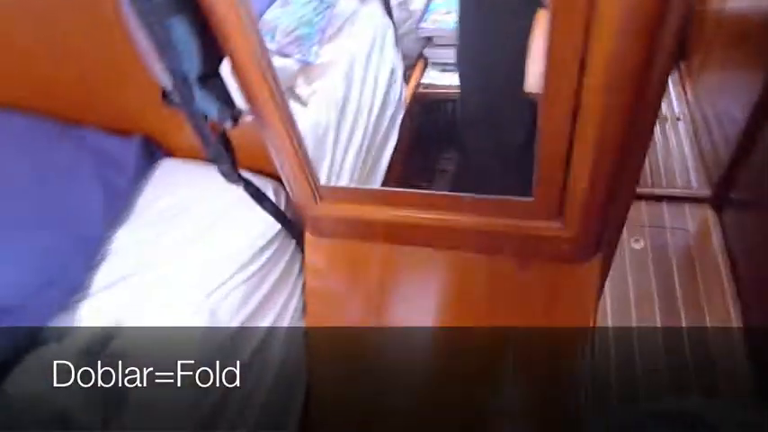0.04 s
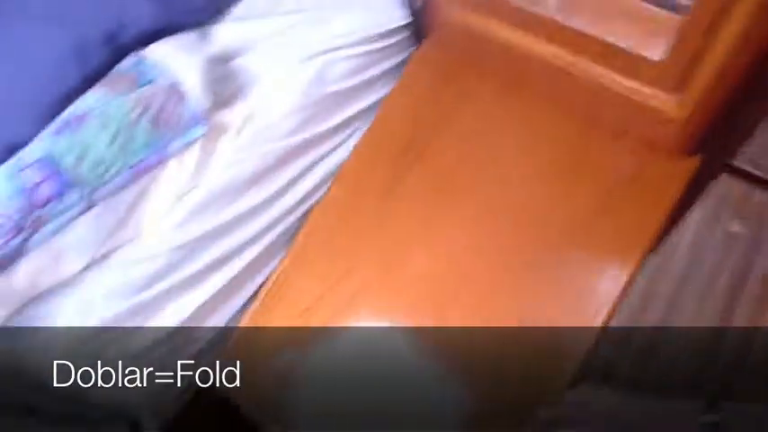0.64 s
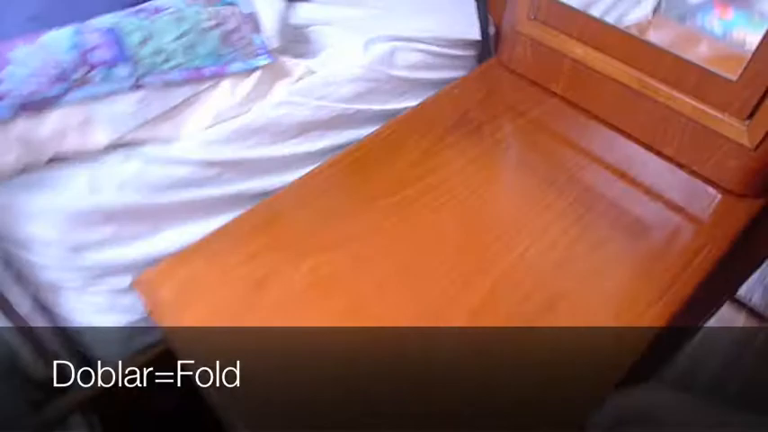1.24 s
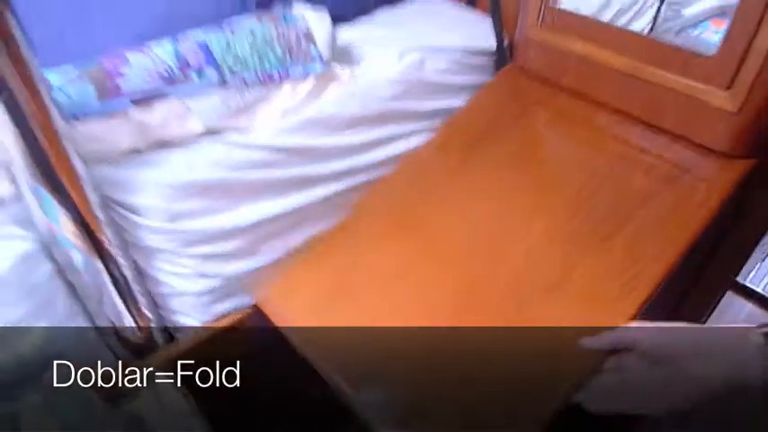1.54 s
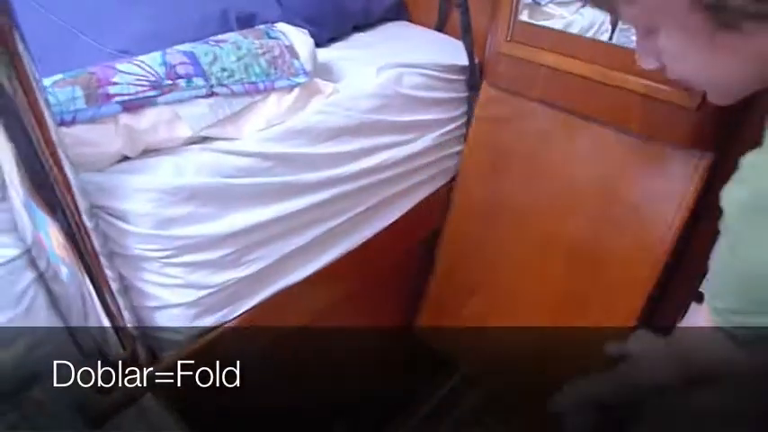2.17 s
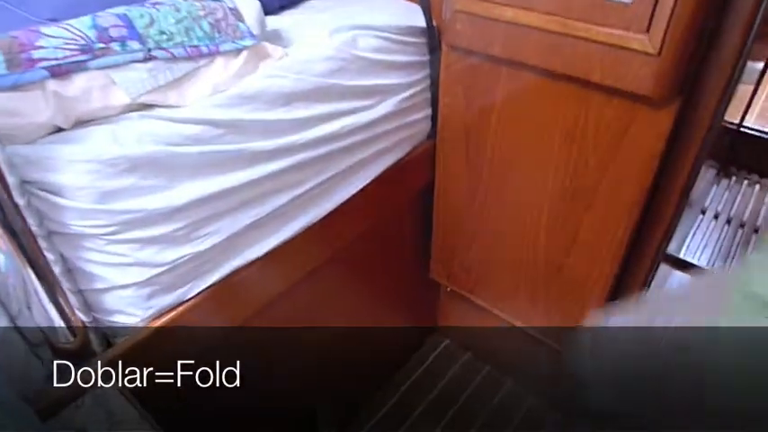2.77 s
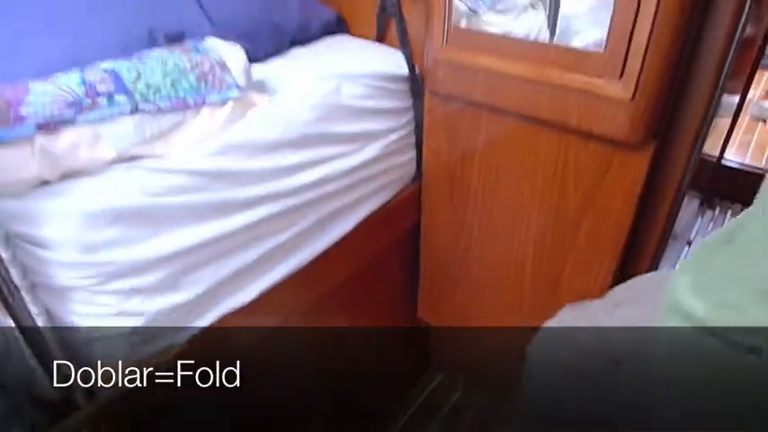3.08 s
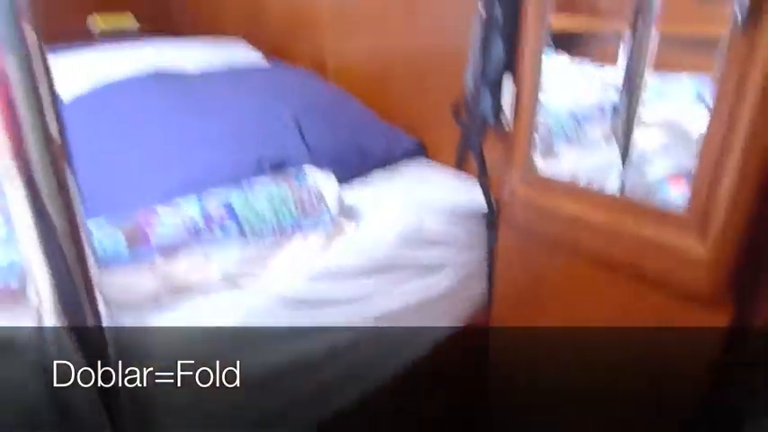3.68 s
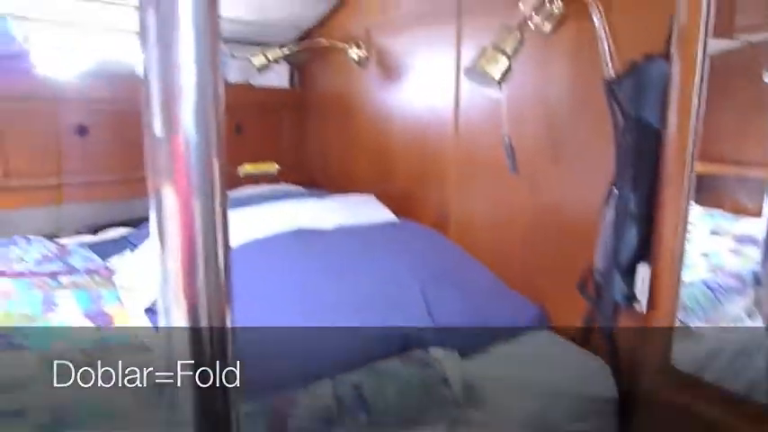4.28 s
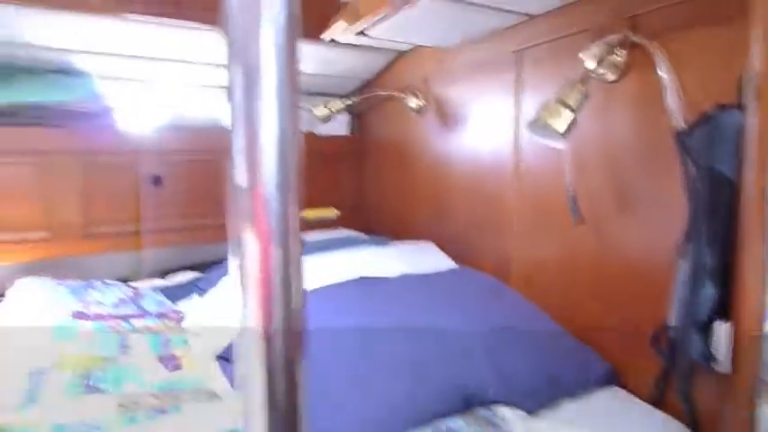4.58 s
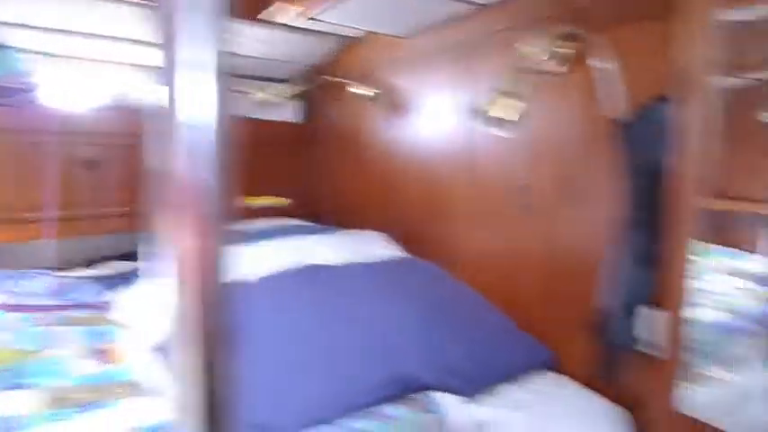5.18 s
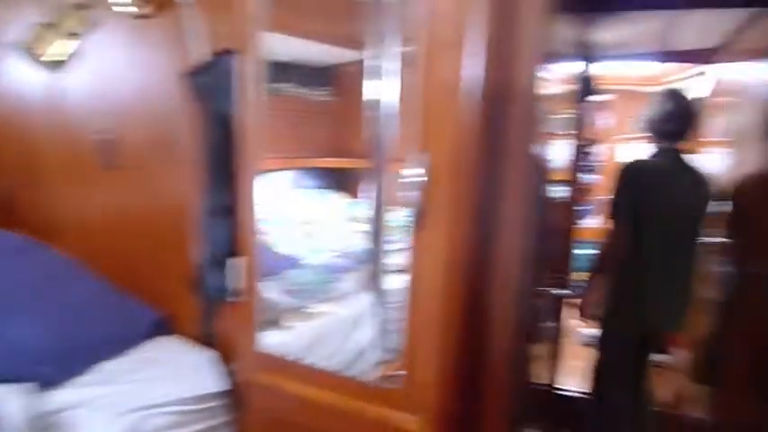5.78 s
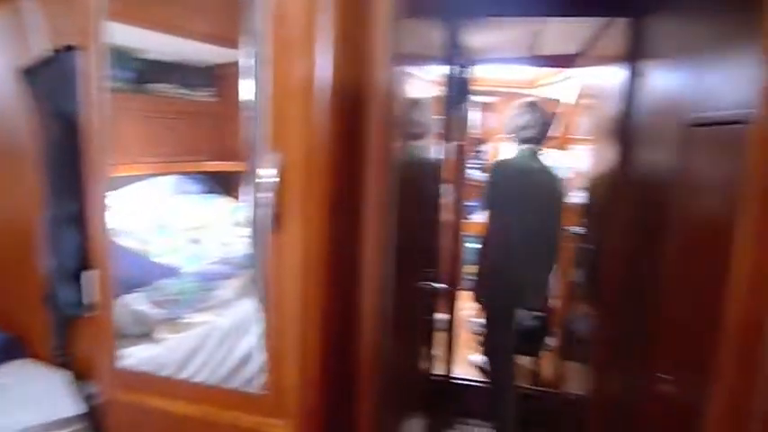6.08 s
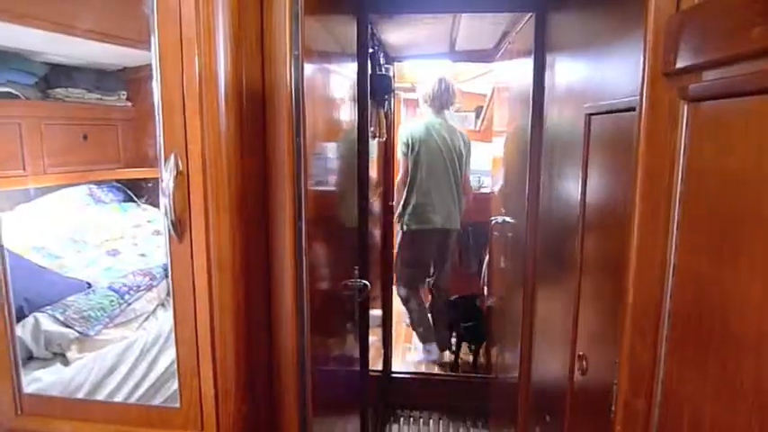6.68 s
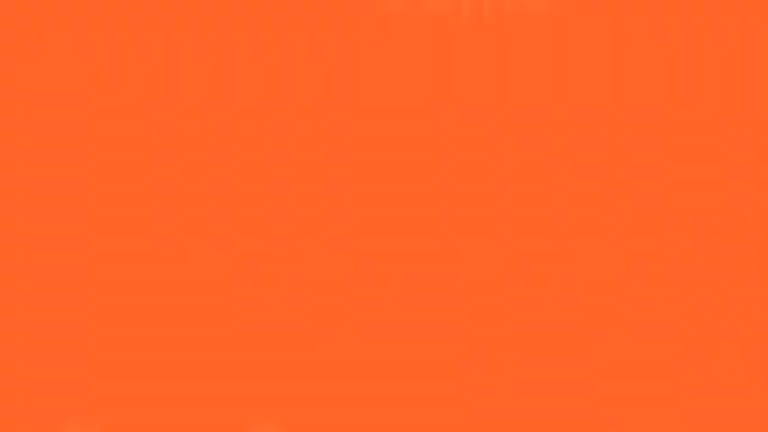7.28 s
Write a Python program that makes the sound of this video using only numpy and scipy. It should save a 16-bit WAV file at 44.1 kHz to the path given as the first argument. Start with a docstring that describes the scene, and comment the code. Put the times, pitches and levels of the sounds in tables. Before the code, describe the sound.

A small wooden boat cabin is heard through a dull handheld microphone, with a faint steady hiss and fan hum. In the first half second come soft thuds and a cluster of close finger clicks, then quiet shuffling and tiny scrapes. A hinged table leaf taps lightly from about 2.1 seconds and hits its stop with a loud, briefly ringing knock at 2.4. At 3.1 it is shoved home with a firm double knock. From about 3.8 someone walks off, with uneven low thuds on a hollow floor, panel bumps, rustling clothes and grip rumble. The heaviest thud lands at 5.4. More knocks, sharp clicks and short scrapes bunch together between 6.1 and 6.4, and a loose board rattles around 7. The fan grows slightly louder along the way. After one last footstep, everything fades quickly at about 7.2 seconds.

```python
"""Inside a small wooden boat cabin, a hinged table leaf is folded down and knocked home, then someone
walks off. Struck panels ring briefly in the tight space, feet set the hollow floor swinging and a loose
board rattles. Hands and soles slide on wood, clothes rustle and a fan hums faintly over a steady hiss.
Fingers click and rumble on the handheld camera, whose dull microphone fades out at the end."""
import sys
import numpy as np
from scipy import signal
from scipy.fft import rfft, irfft
from scipy.io import wavfile
from scipy.ndimage import uniform_filter1d

SR = 44100
rng = np.random.default_rng(int(sys.argv[2]) if len(sys.argv) > 2 else 0)


def inscribe(sig):
    """Save sig as 16-bit PCM at rate SR to the path in sys.argv[1].

    A 1-D sig is mono; a 2-D sig holds one channel per row.
    Samples are clipped to [-1, 1] before scaling.
    """
    pcm = np.round(np.clip(np.atleast_2d(sig).T, -1, 1) * 32767)
    wavfile.write(sys.argv[1], SR, pcm.astype(np.int16))


N = 332073
TIME = np.arange(N) / SR
HIT = TIME[:SR // 2]  # half a second: the clock for one short sound


# the leaf swings down, scuffs its frame and hits the stop: t/s, level/dB, hardness (0 soft, 1 hard)
LEAF_BLOWS = [(2.094,-37.5,0.01), (2.17,-39.5,0.31), (2.251,-37,0.3), (2.3525,-25.5,0.74),
              (2.364,-23.5,0.38)]
# the leaf's own notes: f/Hz, level/dB, t60/s (the time to die away by 60 dB)
LEAF_NOTES = [(172,-0.5,0.11), (286.6,5,.24), (324,3,.14), (422,-6,.12), (509,4,0.092), (678,4,0.11),
              (741,0,.12), (878,1.5,0.088), (950,-1,0.08), (1025,0,.11), (1160,-3.5,0.089), (1470,-8,0.068),
              (1700,-4.5,.13), (1880,-9.5,.13), (2100,-5,0.093), (2210,-5.5,0.13), (2577,-6.5,.11),
              (2980,-3,0.084), (3160,-5.5,0.11), (3600,-5,.1)]

def table_leaf():
    """Each blow makes the wooden leaf ring clearly with its own notes."""
    out = np.zeros(N)
    for s, db, hardness in LEAF_BLOWS:
        add(out, s, knock(LEAF_NOTES, db, hardness, t60=0.17, notes_db=7, scatter_db=2))
    return out


# the leaf is shoved home, edge first and then flat: t/s, level/dB, hardness
FRAME_BLOWS = [(3.0396,-25,.4), (3.0644,-24.5,0.49), (3.0767,-31.5,.3)]
# the frame's own notes: f/Hz, level/dB, t60/s
FRAME_NOTES = [(169.5,-0.5,.15), (265.7,0,.13), (351,-0.5,.13), (400,-3,.13), (470,-1,0.088), (518,1,0.077),
               (555,-1,0.11), (638,-1,.14), (681,-2.5,.12), (854,-10,0.069), (1080,-10,.1), (1332,-7.5,.14),
               (1520,-12,.15), (1573,-10,.1), (1653,-10,.1), (1873,-8,0.082), (2150,-13.5,.12),
               (2600,-10.5,.11), (2848,-18,.12), (3220,-15,.09), (3510,-8.5,0.079)]

def table_frame():
    """The frame rings briefly as the leaf is pushed against it."""
    out = np.zeros(N)
    for s, db, hardness in FRAME_BLOWS:
        add(out, s, knock(FRAME_NOTES, db, hardness, t60=0.095, notes_db=5, scatter_db=5))
    return out


# borders of a knock's four pitch bands (boom, body, rap and crack): f/Hz
BAND_EDGES = [120, 280, 700, 1700, 4500]

def knock(notes, db, hardness, t60, notes_db, scatter_db, soft_hz=189.5, hard_hz=2800):
    """A blow on wood: a short tick, the wood's own notes and dense echoes off the close walls."""
    # a harder blow sounds brighter; it loses 3.5 dB an octave below its centre and 8 above
    centre_hz = soft_hz * (hard_hz / soft_hz) ** hardness
    edges = np.log2(BAND_EDGES)
    octaves = (edges[:-1] + edges[1:]) / 2 - np.log2(centre_hz)
    band_dbs = db + np.minimum(3.5 * octaves, -8 * octaves)
    tones = []
    for hz, note_db, note_t60 in notes:
        # each spot on the wood wakes its own mix of notes
        detune, size = rng.standard_normal(2)
        tone = np.sin(2 * np.pi * (hz * (1 + 0.0067 * detune) * HIT + rng.random()))
        # a hand or foot resting on the wood cuts the ring short
        tones.append((hz, undb(note_db + scatter_db * size) * decay(min(note_t60, t60)) * tone))
    # a soft, dull blow takes longer to reach full strength
    push_s = 0.0029 * 2 ** ((max(band_dbs) - band_dbs[-1]) / 14)
    push = 4 - np.exp(-HIT / push_s)
    contact = undb(1) * decay(0.0044)
    out = 0
    for lo, hi, band_db in zip(BAND_EDGES, BAND_EDGES[1:], band_dbs):
        # bedding and cushions soak up the treble slightly sooner
        tail = decay(t60 * (BAND_EDGES[1] / hi) ** 0.0098)
        noise = rng.standard_normal(len(HIT)) * (contact + tail)
        echoes = strike_level(band(noise * push, lo, hi), 0)
        ringing = sum(tone for hz, tone in tones if lo <= hz < hi)
        ring = strike_level(band(ringing * push, lo, hi), notes_db)
        tick = strike_level(band(1. * (HIT == 0), lo, hi), -8)
        out = out + strike_level(tick + echoes + ring, band_db)
    return out


# steps and soft bumps on the floor and lockers, and the leaf's deep ring as it hits the stop: t/s, peak
# level/dB, f/Hz, push time/s
THUDS = [(0.029,-34,93.5,0.0026), (.277,-37.5,157,0.0034), (0.374,-42.5,172,0.006), (0.509,-31,110.5,.006),
         (2.3535,-23,299,0.002), (2.904,-35.5,93.6,0.014), (3.07,-21.5,170.6,0.0052),
         (3.346,-34.5,214,0.02), (3.772,-30,160,0.012), (4.238,-24,76.6,0.0074), (4.798,-20,87.5,0.012),
         (4.864,-23,78,0.028), (5.095,-28,224,0.015), (5.175,-31,166,0.013), (5.406,-15.5,133,0.0032),
         (5.425,-23.5,110.5,0.0036), (6.226,-26.5,234,0.0053), (6.382,-30.5,155,0.0045),
         (7.142,-22,146,0.0084)]

def footfalls(overtone_ratio=1.315, overtone_db=-9, rumble_db=-11, t60=0.12):
    """A soft heel pushes the hollow floor, which swings for a few cycles; the leaf's hardest blow swings the
    same way."""
    out = np.zeros(N)
    for s, db, hz, push_s in THUDS:
        phase = 2 * np.pi * hz * HIT
        swing = np.sin(phase) + undb(overtone_db) * np.sin(phase * overtone_ratio)
        low_noise = band(rng.standard_normal(len(HIT)), 33, 430, order=2)
        rumble = level(resonate(low_noise, hz, width_hz=hz), rumble_db)
        thud = (swing + rumble) * decay(t60) * np.minimum(HIT / push_s, 1)
        add(out, s, thud * undb(db) / np.abs(thud).max())
    return out


# bumps on doors, panels and floorboards: t/s, level/dB, hardness, t60/s of the cabin's ring
BUMPS = [(.031,-41.5,0.64,0.1), (.509,-41,0,0.17), (.827,-52,0.27,.08), (1.29,-45,0.27,0.11),
         (2.732,-46,0,0.044), (3.761,-37,0.32,0.15), (3.833,-46.5,0.83,0.34), (4.339,-33.5,0.47,0.3),
         (4.436,-43,0.54,0.14), (4.706,-38.5,0.2,0.12), (4.839,-39,0.76,0.41), (4.932,-37,0.57,0.2),
         (5.0805,-33,0.96,0.19), (5.089,-38.5,0.48,0.21), (5.144,-38.5,0.58,0.22), (5.216,-32.5,0.53,0.087),
         (5.2331,-30.5,0.9,0.12), (5.368,-31,0.46,0.29), (6.111,-40,0.64,0.13), (6.133,-36,0.66,0.15),
         (6.16,-35.5,0.52,0.21), (6.227,-36.5,0.77,0.26), (6.2602,-35.5,0.6,0.22), (6.641,-49,0.63,0.068),
         (7.144,-32.5,0.3,0.17)]
# the panels' own notes: f/Hz, level/dB, t60/s
PANEL_NOTES = [(166,0,0.19), (223,2,0.076), (263.2,-0.5,0.49), (319,8,0.19), (362.4,3.5,0.14),
               (441.5,-3.5,0.14), (501,-8.5,0.03), (559,-6.5,0.15), (642,-2,0.15), (683,-2,0.056),
               (774,-5.5,0.21), (882,-3.5,0.28), (993,-4,0.1), (1070,-7.5,0.074), (1223,-5.5,0.12),
               (1342,-5.5,0.12), (1497,-3,0.073), (1665,-7,0.048), (1890,-8,0.098), (2030,3,0.068),
               (2255,1,0.13), (2410,-5,0.14), (2600,-5,0.069), (2740,-1,0.063), (3020,-5,0.11),
               (3310,-3.5,0.047)]

def panel_bumps():
    """Bumped panels and boards ring less clearly than the table."""
    out = np.zeros(N)
    for s, db, hardness, t60 in BUMPS:
        add(out, s, knock(PANEL_NOTES, db, hardness, t60, notes_db=0, scatter_db=3.5))
    return out


# one blow and its bounces: t/s, level/dB, hardness
BOUNCES = [(6.933,-29,0.71), (6.946,-38,0.3), (6.963,-32.5,0.6), (6.995,-35.5,0.15), (7.011,-41,0.58),
           (7.029,-39,0.46), (7.046,-40,0.3)]

def loose_board():
    """A loose board is struck and rattles as it bounces unevenly."""
    out = np.zeros(N)
    for s, db, hardness in BOUNCES:
        add(out, s, knock(PANEL_NOTES, db, hardness, t60=0.17, notes_db=-0.5, scatter_db=5))
    return out


# fingers on the camera, and catches and stops nearby: t/s, level/dB, f/Hz, width/Hz, t60/s
CLICKS = [(0.03,-63,2200,1980,0.028), (0.2741,-30.5,1200,1700,0.0053), (0.2749,-29,3150,1500,0.0062),
          (.3027,-36.5,1900,3000,0.018), (.3055,-41.5,1600,2000,0.024), (.3178,-39.5,2600,2400,0.01),
          (.321,-43,2100,1500,.022), (.3263,-35.5,3070,1410,.012), (.3302,-42,2500,2000,0.015),
          (.3365,-44,2600,2000,0.02), (2.3525,-33,4100,3200,0.005), (2.3545,-32,2480,2000,0.03),
          (3.04,-25,445,130,0.043), (3.0655,-26,440,240,0.02), (3.0676,-32,1450,900,0.016),
          (3.066,-35.5,2900,900,0.025), (3.772,-42.5,870,200,0.091), (4.342,-32.5,955,220,0.18),
          (5.2325,-32,2500,900,0.014), (5.369,-32.5,890,700,0.11), (6.1118,-33.5,3300,1600,0.07),
          (6.1412,-29,404,600,0.013), (6.161,-39.5,3100,1200,0.028), (6.2128,-34.5,3040,900,0.13),
          (6.24,-37.5,3050,800,0.029), (6.2613,-24,620,260,0.077), (6.3809,-33,1450,450,0.016),
          (6.4068,-40,2600,2400,0.012), (6.643,-47.5,1000,500,.05), (6.816,-33.5,230,160,0.013),
          (7.072,-39.5,960,400,0.059)]

def clicks(chatter=0.29, case_db=-4):
    """Small contacts close to the microphone give a dry snap and a short chatter."""
    out = np.zeros(N)
    for s, db, hz, width_hz, t60 in CLICKS:
        force = chatter * rng.standard_normal(len(HIT)) * decay(t60)
        force[0] += 1
        snap = resonate(force, hz, width_hz)
        # the camera's hollow case adds its own note
        snap = snap + undb(case_db) * resonate(snap, hz=620, width_hz=450)
        # a soft contact makes little sound above its ring
        snap = band(snap, min(hz * 0.3, 350), min(hz * 1.66, SR / 4))
        add(out, s, strike_level(snap, db))
    return out


# things dragging and brushing past: t/s, length/s, level/dB, f/Hz, width/Hz
SCRAPES = [(0.361,0.034,-45,2150,1800), (0.904,0.022,-54,2480,1300), (0.964,0.031,-49.5,1640,1000),
           (1.081,0.026,-52,2000,1300), (1.279,0.052,-50,2000,1500), (1.55,0.027,-51,1700,1400),
           (1.59,0.1,-53,2300,1500), (1.833,0.023,-52,1600,800), (2.269,0.15,-37.5,430,250),
           (4.7,0.041,-48,2200,1500), (4.88,0.048,-48,2200,1590), (5.464,0.047,-43.5,2630,1500),
           (5.566,0.16,-44,4050,1490), (6.123,0.072,-40,2800,1800), (6.234,0.068,-39.5,2930,1100),
           (6.496,0.086,-47.5,2970,1200)]

def scrapes(slips_per_s=2500):
    """Surfaces catch and slip, making a rasp of tiny ticks that swells and dies away."""
    out = np.zeros(N)
    for s, length, db, hz, width_hz in SCRAPES:
        ticks = resonate(slips(len(HIT), slips_per_s), hz, width_hz * 2)
        rasp = level(resonate(ticks, hz, width_hz * 2), db)
        swell = np.sqrt(np.abs(np.sin(np.pi * np.minimum(HIT / length, 1))))
        add(out, s, rasp * swell)
    return out


# how busily people move while folding, then walking off: t/s, shuffle level/dB, cloth level/dB
FOLDING = [(0.0, -47.5, -57.5), (0.21, -51.5, -54), (0.45, -60.5, -62), (0.67, -60, -59.5),
           (1.07, -49, -54.5), (1.27, -44, -53), (1.94, -48.5, -58.5), (2.29, -41.5, -54.5),
           (2.45, -49.5, -72), (2.67, -56.5, -61.5), (2.95, -50, -59.5), (3.1, -49.5, -68),
           (3.49, -55.5, -68), (4.15, -48, -57.5)]
WALKING = [(4.4, -45.5, -54), (4.76, -47.5, -50.5), (5.29, -39, -50.5), (5.63, -46, -47),
           (5.93, -46, -53.5), (6.29, -42.5, -50.5), (6.57, -44, -51.5), (7.05, -43, -55.5),
           (7.1, -42, -54.5)]

def bustle(s):
    """How strong the shuffling and the cloth rubbing are at the given times, in dB."""
    times, shuffle_db, cloth_db = np.vstack([FOLDING, WALKING]).T
    return np.interp(s, times, shuffle_db), np.interp(s, times, cloth_db)


# the tone colours of low shuffling and of brighter cloth: f/Hz, level/dB
SHUFFLE_COLOUR = [(65, -36), (110, -4.5), (166, 2.5), (258, -4), (305, -3), (403, -7.5), (597, -5),
                  (646, -9), (675, -13), (1600, -19), (2080, -51.5), (3520, -120)]
CLOTH_COLOUR = [(410, -30), (700, -1), (1530, -2.5), (2000, -4), (2420, -4.5), (2730, -7), (3420, -5.5),
                (5140, -29.5), (6720, -31), (7500, -52), (9750, -68.5), (16500, -120)]

def shuffle_and_rustle(shuffle_trim_db=-1.95, cloth_trim_db=-0.5):
    """Hands and soles slide on wood; cloth rubs in many tiny slips."""
    shuffle_db, cloth_db = bustle(TIME)
    shuffle = colour(rng.standard_normal(N), SHUFFLE_COLOUR) * undb(0.84 * wander(35))
    cloth = colour(slips(N, per_s=5000), CLOTH_COLOUR) * undb(2 * wander(40))
    return shuffle * undb(shuffle_db + shuffle_trim_db) + cloth * undb(cloth_db + cloth_trim_db)


def light_taps(count=16, until_s=7.185, offset_db=-9, spread_db=9):
    """Fingers and toes touch the wood at random, louder when the shuffling is louder."""
    out = np.zeros(N)
    for when, size, firmness in rng.random((count, 3)):
        s = when * until_s
        db = bustle(s)[0] + offset_db + spread_db * (2 * size - 1)
        add(out, s, knock(PANEL_NOTES, db, 0.85 * firmness, t60=0.11, notes_db=9, scatter_db=4))
    return out


# the hand shifts its hold on the camera: t/s, level/dB
JOLTS = [(1.25,-59.5), (2.9,-51.5), (4.288,-39), (4.66,-52), (5.058,-33.5), (5.38,-45.5), (6.13,-39.5),
         (6.92,-41.5)]

def grip_rumble(offset_db=-10, rise_s=0.04, fall_s=0.11):
    """The hand rumbles through the camera's body, along with the shuffling and at each jolt."""
    force = undb(bustle(TIME)[0] + offset_db)
    for s, db in JOLTS:
        age = np.maximum(TIME - s, 0)
        force = force + undb(db) * np.minimum(age / rise_s, np.exp((rise_s - age) / fall_s))
    return level(band(rng.standard_normal(N), 46, 135, order=2)) * force


# the fan's tones: f/Hz, level/dB
FAN_TONES = [(151,-61), (382,-65), (425,-67.5), (953,-72), (1270,-76)]
# the hum of air in its housing: f/Hz, width/Hz, level/dB
FAN_HOUSING = (637, 19, -61.5)
# both get louder as the fan gets nearer: t/s, added level/dB
FAN_NEARNESS = [(0,-10), (3.6,-3.5), (5.6,6), (7.2,7.5)]

def fan(waver_hz=3.51, flutter_db=3):
    """A fan gives wavering tones, and its air hums in the housing."""
    tones = 0
    for hz, db in FAN_TONES:
        strength = np.sqrt(2) * undb(db + flutter_db * wander(14))
        pitch_hz = hz + waver_hz * wander(15)
        tones = tones + strength * np.sin(2 * np.pi * np.cumsum(pitch_hz) / SR)
    hz, width_hz, db = FAN_HOUSING
    hum = level(resonate(rng.standard_normal(N), hz, width_hz), db)
    return (tones + hum) * undb(np.interp(TIME, *np.transpose(FAN_NEARNESS)))


# the tone colour of the cabin's background: f/Hz, level/dB
AIR_COLOUR = [(15, -52), (25, -24.5), (33, -15), (111, -4.5), (145, -1), (224, -23), (272, -1), (322, -32),
              (381, -8), (410, -27), (618, -13), (887, -25), (1440, -18), (6250, -26), (7960, -34),
              (10300, -69.5), (17500, -120)]

def cabin_air():
    """A faint, steady hiss lies under everything."""
    return level(colour(rng.standard_normal(N), AIR_COLOUR), db=-60.5)


def undb(db):
    """Turn decibels into a number to multiply by."""
    return 10 ** (np.asarray(db) / 20)


def level(x, db=0):
    """Set a sound's average (rms) level."""
    return x * undb(db) / np.sqrt(np.mean(x ** 2))


def strike_level(x, db):
    """Set a hit's average level over its first 20 ms."""
    return x * undb(db) / np.sqrt(np.mean(x[:SR // 50] ** 2))


def decay(t60):
    """A curve that falls 60 dB in t60 seconds."""
    return np.exp(-np.log(1000) * HIT / max(t60, .001))


def band(x, lo_hz, hi_hz, order=3):
    """Keep the sound between two pitches."""
    return signal.sosfilt(signal.butter(order, [lo_hz, hi_hz], "band", fs=SR, output="sos"), x + 1e-18)


def resonate(x, hz, width_hz):
    """Make a sound ring at one pitch; a narrower width rings longer."""
    return signal.lfilter(*signal.iirpeak(hz, hz / width_hz, fs=SR), x + 1e-18)


def colour(x, points):
    """Shape a sound's bass and treble by (f/Hz, level/dB) points; its average level ends up at 0 dB."""
    hz, db = np.transpose(points)
    bins = np.maximum(np.fft.rfftfreq(N, 1 / SR), 1)
    gain = undb(np.interp(np.log(bins), np.log(hz), db))
    return level(irfft(rfft(x) * gain, N))


def wander(per_s):
    """A smooth random drift, about 1 in size."""
    step = int(SR / per_s)
    stairs = np.repeat(rng.standard_normal(N // step + 1), step)
    return level(uniform_filter1d(stairs, step)[:N])


def slips(samples, per_s):
    """Tiny ticks of random size at random times."""
    return (rng.random(samples) < per_s / SR) * rng.standard_normal(samples)


def add(track, s, sound):
    """Mix a sound in at s seconds."""
    i = max(int(s * SR), 0)
    track[i:i + len(sound)] += sound[:N - i]


def muffle(x, cutoff_hz=3520, leak_db=-23.5):
    """The microphone's opening lets only a little of the high treble through."""
    low = signal.sosfilt(signal.butter(7, cutoff_hz, fs=SR, output="sos"), x)
    return low + undb(leak_db) * x


def scene():
    """All the sounds meet at one microphone."""
    contacts = table_leaf() + table_frame() + panel_bumps()
    contacts += clicks() + scrapes() + loose_board() + light_taps()
    return (muffle(contacts) + footfalls() + grip_rumble() + shuffle_and_rustle() + fan() + cabin_air())[None]


def record(dry, fade_start_s=7.185, fade_end_s=7.262, top_hz=7400):
    """The camera fades out at the end and cuts off the highest treble."""
    fade = np.interp(TIME, [fade_start_s, fade_end_s], [1, 0])
    return signal.sosfilt(signal.ellip(8, .3, 70, top_hz, fs=SR, output="sos"), dry * fade)


dry = scene()
out = record(dry)
inscribe(out)
```